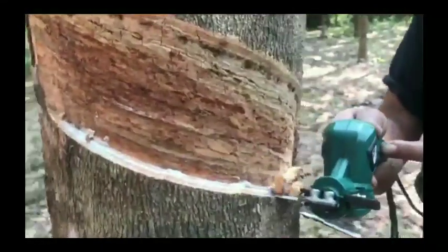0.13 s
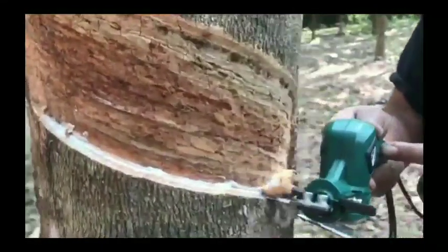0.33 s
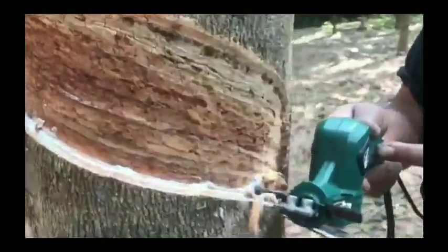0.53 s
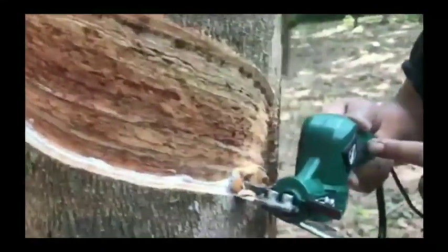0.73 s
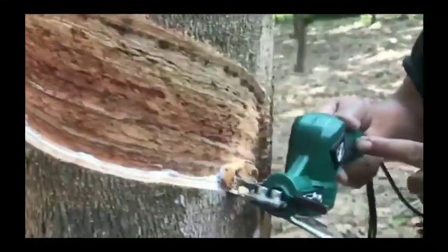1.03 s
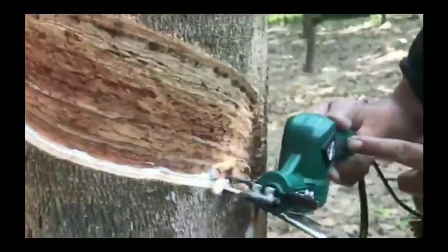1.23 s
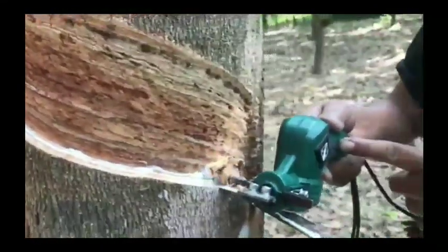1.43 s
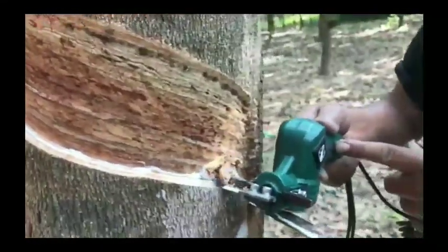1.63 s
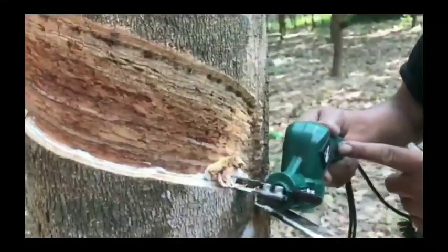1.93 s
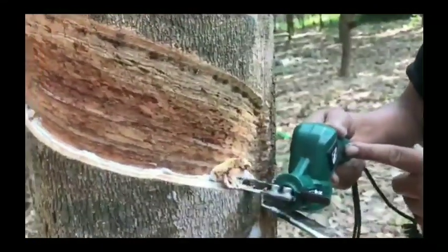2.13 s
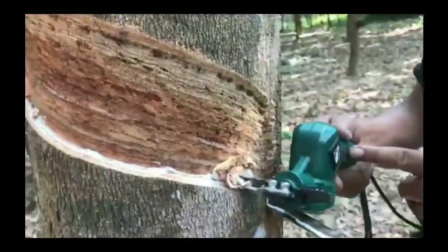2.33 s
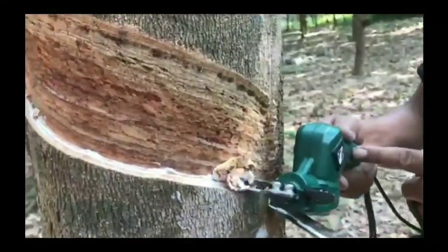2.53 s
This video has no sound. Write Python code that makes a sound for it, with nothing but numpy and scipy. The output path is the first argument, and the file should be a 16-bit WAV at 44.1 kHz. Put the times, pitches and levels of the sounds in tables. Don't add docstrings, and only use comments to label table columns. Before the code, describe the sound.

Steady raspy buzz of a small handheld power cutter chattering through tree bark, close and dry.

```python
import sys
import numpy as np
from scipy import signal
from scipy.fft import rfft, irfft, next_fast_len
from scipy.io import wavfile
from scipy.ndimage import map_coordinates

SR = 44100
rng = np.random.default_rng(int(sys.argv[2]) if len(sys.argv) > 2 else 0)


def store_wav(level_fs):
    pcm = np.round(np.clip(np.atleast_2d(level_fs), -1, 1) * 32767)
    wavfile.write(sys.argv[1], SR, pcm.T.astype(np.int16))


def amplitude_ratio(level_db):
    exponent = np.asarray(level_db, float) / 20
    return 10 ** exponent


N = 119070

# time_s, turns_per_s, return_share (part of a turn from forward to return knock)
CRANK_SPEED = [(0.0, 76.67, 0.453), (0.075, 77.06, 0.34), (0.15, 77.25, 0.288), (0.225, 76.84, 0.362),
               (0.3, 76.47, 0.412), (0.375, 76.58, 0.398), (0.45, 76.43, 0.419), (0.525, 76.54, 0.37),
               (0.6, 76.63, 0.371), (0.675, 76.61, 0.349), (0.75, 76.69, 0.382), (0.825, 76.79, 0.419),
               (0.9, 76.45, 0.45), (0.975, 76.79, 0.364), (1.05, 76.97, 0.324), (1.125, 76.94, 0.37),
               (1.2, 77.15, 0.343), (1.275, 77.2, 0.396), (1.35, 77.05, 0.408), (1.425, 76.94, 0.434),
               (1.5, 77.17, 0.386), (1.575, 77.27, 0.435), (1.65, 77.08, 0.48), (1.725, 77.06, 0.459),
               (1.8, 77.2, 0.419), (1.875, 78.03, 0.425), (1.95, 78.51, 0.469), (2.025, 78.46, 0.507),
               (2.1, 78.48, 0.454), (2.175, 79.21, 0.475), (2.25, 80.51, 0.579), (2.325, 79.75, 0.529),
               (2.4, 78.95, 0.547), (2.475, 78.98, 0.533), (2.55, 77.8, 0.466), (2.625, 78.62, 0.373),
               (2.7, 82.5, 0.573)]


def unit(x):
    return x / np.sqrt(np.mean(x ** 2) + 1e-20)


def along(points, hz):
    f, v = np.transpose(points)
    return np.interp(np.log(hz + 1), np.log(f + 1), v)


def curves(rows, t=None):
    s, *columns = np.transpose(rows)
    if t is None:
        t = np.arange(N) / SR
    return [np.interp(t, s, column) for column in columns]


def wobble(rate, t):
    return map_coordinates(rng.standard_normal(400), [t * rate + 1])


def filtered(x, response):
    m = next_fast_len(N + 8192)
    hz = np.fft.rfftfreq(m, 1 / SR)
    return irfft(rfft(x, m) * response(hz), m)[..., :N]


def coloured_noise(colour):
    return unit(filtered(rng.standard_normal(N), lambda hz: amplitude_ratio(along(colour, hz))))


def lay(times, rows):
    at = np.floor(times * SR).astype(int)[:, None] + np.arange(rows.shape[1])
    return np.bincount(at.ravel(), rows.ravel(), N + SR)[:N]


def knocks():
    # time_s, body_forward_db, body_return_db, chips_forward_db, chips_return_db
    bite = [(0.0, -1.0, 1.0, 6.0, -2.0), (0.07, -4.0, 1.0, -1.0, -4.0), (0.14, -1.0, 2.0, -2.0, -4.0),
            (0.21, 4.0, 0.0, 3.0, -4.0), (0.28, -1.0, 2.0, -1.0, -2.0), (0.35, 3.0, 1.0, -0.0, 1.0),
            (0.42, -8.0, 3.0, -1.0, -1.0), (0.48, 0.0, -1.0, -2.0, 1.0), (0.55, 0.0, 4.0, 0.0, -4.0),
            (0.62, 4.0, 0.0, 1.0, -1.0), (0.69, 2.0, 3.0, 2.0, -1.0), (0.76, 3.0, -0.0, -0.0, 1.0),
            (0.83, 1.0, 1.0, 4.0, -1.0), (0.9, -3.0, -2.0, 0.0, 5.0), (0.97, -0.0, 1.0, -1.0, -2.0),
            (1.04, 1.0, 2.0, 1.0, -3.0), (1.11, 3.0, 1.0, 3.0, 2.0), (1.18, 0.0, 2.0, 0.0, -3.0),
            (1.25, 3.0, 1.0, 1.0, -1.0), (1.32, -6.0, 1.0, -1.0, 1.0), (1.38, 0.0, -1.0, -1.0, 2.0),
            (1.45, -1.0, -1.0, -2.0, 2.0), (1.52, 5.0, -1.0, 0.0, 2.0), (1.59, 1.0, -3.0, 2.0, 4.0),
            (1.66, 2.0, -1.0, 2.0, 2.0), (1.73, 0.0, -5.0, 2.0, 5.0), (1.8, 3.0, -0.0, -1.0, -2.0),
            (1.87, -2.0, 0.0, 1.0, 3.0), (1.94, -1.0, -4.0, -3.0, 3.0), (2.01, 0.0, -1.0, -1.0, 4.0),
            (2.08, -0.0, -5.0, -3.0, 4.0), (2.15, 3.0, 3.0, -1.0, -1.0), (2.22, -4.0, -6.0, -3.0, 4.0),
            (2.28, -2.0, -1.0, -2.0, -3.0), (2.35, 2.0, 4.0, 3.0, -2.0), (2.42, -1.0, -2.0, 2.0, -0.0),
            (2.49, -0.0, 3.0, -2.0, -2.0), (2.56, -2.0, -1.0, 1.0, -0.0), (2.63, 1.0, 0.0, -3.0, -2.0),
            (2.7, -5.0, 2.0, -0.0, -0.0)]
    # time_s, factor on the timing scatter
    slack = [
        (0, 1.6),
        (.4, 1),
        (1.9, 1),
        (2.2, 3.5),
        (2.7, 4),
    ]
    start_turn, most_turns = .409, 215
    jitter_s, wander_s, scatter_db = .000022, .00005, .8

    speed, share = curves(CRANK_SPEED)
    turns = start_turn + np.cumsum(speed) / SR
    never = N / SR + .1
    clock = np.arange(N) / SR
    times = np.concatenate([
        np.interp(np.arange(most_turns), turns - end * share, clock, left=never, right=never)
        for end in (0, 1)])
    end = np.repeat([0, 1], most_turns)
    chance = rng.standard_normal((len(end), 2))
    s = np.abs(times + jitter_s * curves(slack, times)[0] * chance[:, 0])
    slow_drift = np.where(end, wobble(20, s), wobble(20, s))
    s = np.abs(s + wander_s * curves(slack, s)[0] * slow_drift)
    body_fwd, body_ret, chip_fwd, chip_ret = np.array(curves(bite, s)) + scatter_db * chance[:, 1]
    return s, np.where(end, body_ret, body_fwd), np.where(end, chip_ret, chip_fwd), end


def ringing(s, body_db, chip_db, end):
    # pitch_hz, t60_s (time to fade by 60 dB), forward_db, return_db, grip_turn_db
    modes = [(925, 0.012, -17, -13, 0), (1165, .018, -16, -18.5, 2), (1773, 0.0028, -6.5, -6, 7),
             (2140, 0.0105, -1, 2, 0), (2830, 0.009, .5, 2, -0.5), (3235, 0.014, 1.5, 0, 0),
             (4010, 0.0087, -5, -33, -1.5), (5480, 0.0062, -3.5, -10, -2), (6090, 0.011, -10.5, -4.5, 3),
             (7180, 0.0041, -17, -24, -12), (8710, 0.006, 0.5, -16, -4), (9600, 0.0055, -6, 3, 2),
             (11050, 0.003, 6, -6, 2), (13160, 0.0025, 3.5, 0, 4)]
    # delay_s, after_forward_db, after_return_db, dull_above_hz
    rebounds = [
        (.0011, -14, -13, 9000),
        (.0018, -18, -5, 1400),
    ]
    # time_s, level_db
    loosens = [
        (0, -7),
        (1.1, -5),
        (1.3, 0),
        (2.7, 0),
    ]
    # time_s, turn (-1 to 1)
    grip = [(0, -0.98), (.5, -1.1), (1.2, -0.097), (1.7, 0.4), (2.2, 0.53), (2.47, 0.59), (2.7, -0.24)]
    # pitch_hz, time_s, width_s, change_db
    freed = [(8710, 0, .07, 6), (8710, .38, .04, 4), (5480, .35, .1, 3), (8710, .83, .04, 5),
             (11050, 1.1, .07, 4), (6090, 1.03, .05, -5), (11050, 1.64, .13, 6), (5480, 1.68, .1, 5),
             (6090, 1.68, .1, 3), (8710, 1.62, .1, -4), (9600, 2.05, .15, 2), (6090, 2.05, .15, -2),
             (6090, 2.48, .18, 7), (4010, 2.5, .2, -5), (9600, 2.38, .04, 3), (1160, 1.85, .12, 3),
             (1160, .75, .2, 2)]
    low_hz, low_share = 1400, .3
    bright_hz = 7000
    mode_scatter_db, drift_db, drift_per_s = 1.7, 1.3, 5
    loose_hz = 5000
    swell_s, crest_s, mode_jitter_s, detune = .00022, .00055, .000015, .008

    out = 0
    grid = np.arange(700) / SR
    loose_db, = curves(loosens, s)
    grip_turn, = curves(grip, s)
    contacts = [(0, 0.044, 0.046, np.inf)] + rebounds
    for hz, t60, mode_fwd_db, mode_ret_db, turn_db in modes:
        drive_db = chip_db if hz > bright_hz else body_db * (low_share if hz < low_hz else 1)
        freed_db = sum(lift_db * np.exp(-((s - at) / width) ** 2)
                       for mode, at, width, lift_db in freed if abs(mode / hz - 1) < .06)
        drift = np.where(end, wobble(drift_per_s, s), wobble(drift_per_s, s))
        mode_db = drive_db + freed_db + turn_db * grip_turn + drift_db * drift
        count = int(min(len(grid), t60 * .7 * SR + 20))
        for delay, fwd_db, ret_db, dull_hz in contacts:
            chance = rng.standard_normal((len(s), 3)) * min(1, hz / loose_hz)
            start = s + delay
            t = np.maximum(grid[:count] - (start * SR % 1 / SR)[:, None], 0)
            end_db = np.where(end, mode_ret_db + ret_db, mode_fwd_db + fwd_db)
            level_db = mode_db + end_db + (delay > 0) * loose_db + mode_scatter_db * chance[:, 1]
            gain = amplitude_ratio(level_db) / (1 + (hz / dull_hz) ** 2)
            cycles = hz * ((t - crest_s) * (1 + detune * chance[:, 2:]) + mode_jitter_s * chance[:, :1])
            envelope = amplitude_ratio(-60 * t / t60) * (1 - np.exp(-t / swell_s)) ** 2
            out = out + lay(start, gain[:, None] * envelope * np.cos(2 * np.pi * cycles))
    return out


def cracks(s, chip_db):
    # pitch_hz, level_db per Hz
    crack_colour = [(500, -71), (3500, -16.5), (4800, -5), (6000, -3), (9500, 1.5), (12000, -5),
                    (14000, -2.5), (15500, -8)]
    attack_s = .00022
    crack_db, crack_t60_s = 2.5, 0.0042
    rattle_db, rattle_t60_s = -11.5, 0.027

    t = np.arange(600) / SR
    fade = amplitude_ratio(crack_db - 60 * t / crack_t60_s) + amplitude_ratio(rattle_db - 60 * t / rattle_t60_s)
    shape = (1 - np.exp(-t / attack_s)) ** 2 * fade
    bursts = lay(np.abs(s - attack_s), amplitude_ratio(chip_db)[:, None] * shape)
    return coloured_noise(crack_colour) * bursts


def tool_path(tool):
    # centre_hz, width_hz, depth (0-1)
    dips = [(4550, 900, .7), (6900, 300, .4), (7600, 700, .55)]
    low_cut_hz = 803

    def response(f):
        ratio = 1j * f / low_cut_hz
        path = (ratio ** 2 / (1 + 0.96 * ratio + ratio ** 2)) ** 2
        for centre, width, depth in dips:
            band = 1j * f * width / (centre * centre - f * f + 1j * f * width)
            path = path * (1 - np.clip(depth, 0, 1) * band)
        return path

    return filtered(tool, response)


def gears():
    # pitch_hz, level_db per Hz
    hiss_colour = [(260, -77), (450, -24.5), (1160, -9), (3020, -0.5), (4510, -19), (5980, -11),
                   (7470, -24), (9610, -10), (15700, -33.5)]
    # time_s, level_db
    hiss_level = [(0, -45.5), (1, -45.5), (1.8, -45.5), (2.7, -45.5)]
    t = np.arange(N) / SR
    return coloured_noise(hiss_colour) * amplitude_ratio(curves(hiss_level)[0] + 1.22 * wobble(11.66, t))


def hum():
    # multiple of the turning speed, level_db
    hum_tones = [(6, -76), (8, -72), (10, -70), (13, -62), (15, -62)]
    # time_s, level_db
    hum_fades = [(0, -6), (.5, -2), (.9, 0), (1.9, 0), (2.2, -4), (2.7, -8)]
    t = np.arange(N) / SR
    turns = np.cumsum(curves(CRANK_SPEED)[0]) / SR
    out = 0
    for multiple, db in hum_tones:
        cycles = round(multiple) * turns + rng.random()
        out = out + amplitude_ratio(db + 2.5 * wobble(6, t)) * np.sin(2 * np.pi * cycles)
    return amplitude_ratio(curves(hum_fades)[0]) * out


def tap():
    # pitch_hz, level_db, t60_s
    wood_tones = [(430, -48, .045), (600, -43, .05), (730, -35.5, .05), (950, -46, .035), (1220, -41, .035)]
    tap_s, rise_s = 1.902, .0035
    t = np.maximum(np.arange(N) / SR - tap_s, 0)
    rise = (1 - np.exp(-t / rise_s)) ** 2
    return sum(amplitude_ratio(db - 60 * t / t60) * rise * np.sin(2 * np.pi * hz * t) for hz, db, t60 in wood_tones)


def wind():
    # time_s, level_db
    wind_level = [(0.0, -68), (0.28, -61.5), (0.33, -68), (0.73, -61), (0.77, -65), (0.92, -60.5),
                  (1.34, -67.5), (1.68, -63.5), (1.97, -67), (2.01, -65.5), (2.68, -65), (2.7, -73)]
    # pitch_hz, level_db per Hz
    rumble_colour = [(15, -9), (31, -5), (50, 0), (75, -7), (108, -11), (334, -20), (500, -24), (1100, -55)]
    # pitch_hz, level_db per Hz
    gust_colour = [(35, -14), (60, 0), (110, -2), (200, -8), (350, -30)]
    gust_s, gust_width_s, gust_db = 1.01, 0.11, -64.5

    t = np.arange(N) / SR
    rumble = coloured_noise(rumble_colour) * amplitude_ratio(curves(wind_level)[0] - 1.5 + 0.72 * wobble(7.9, t))
    swell = np.exp(-((t - gust_s) / gust_width_s) ** 2)
    return rumble + coloured_noise(gust_colour) * amplitude_ratio(gust_db) * swell


def scene():
    knock_db = -31
    s, body_db, chip_db, end = knocks()
    tool = amplitude_ratio(knock_db) * (ringing(s, body_db, chip_db, end) + cracks(s, chip_db))
    return (tool_path(tool) + gears() + hum() + tap() + wind())[None]


def top_cut(x):
    return signal.sosfilt(signal.butter(12, 16020, fs=SR, output="sos"), x)


def record(dry):
    shelf_hz, shelf_db, top_hz = 15470, -15, 15830
    mix = filtered(dry, lambda hz: np.where(hz < shelf_hz, 1, amplitude_ratio(shelf_db)) * (hz < top_hz))
    return top_cut(mix)


dry = scene()
out = record(dry)
store_wav(out)
```